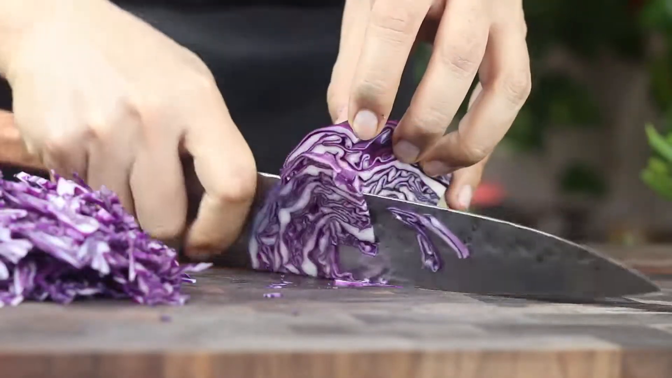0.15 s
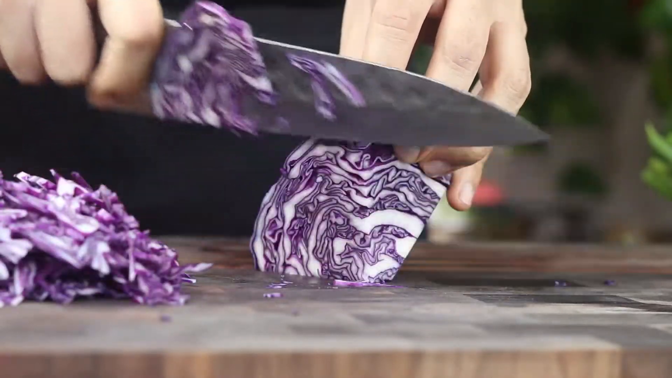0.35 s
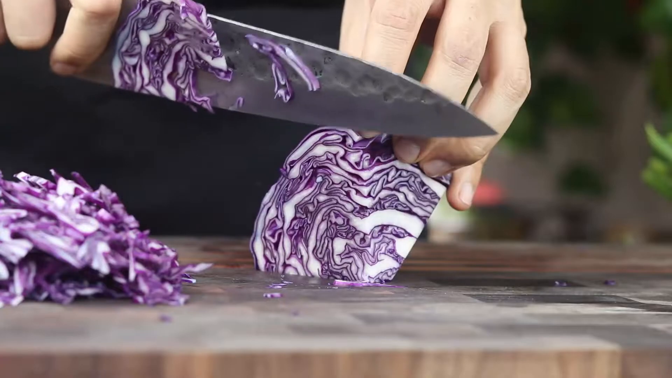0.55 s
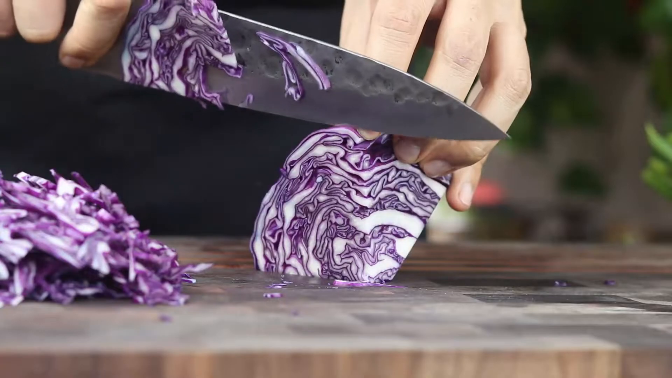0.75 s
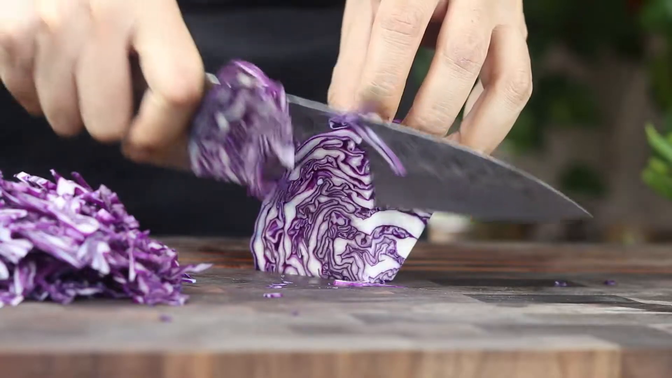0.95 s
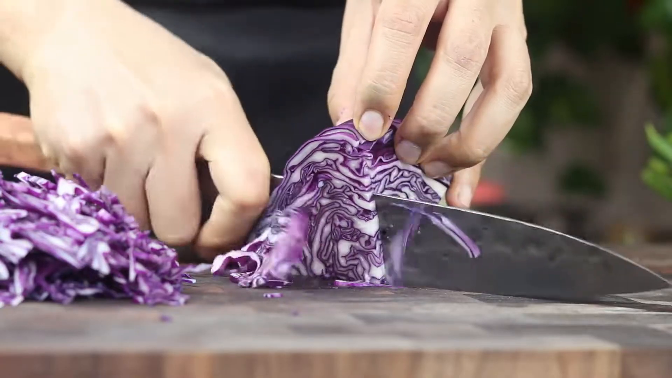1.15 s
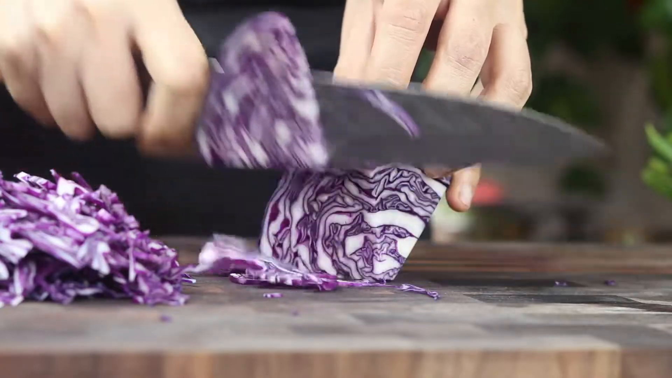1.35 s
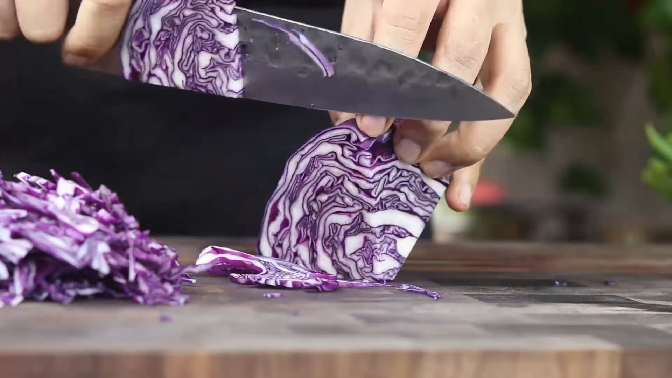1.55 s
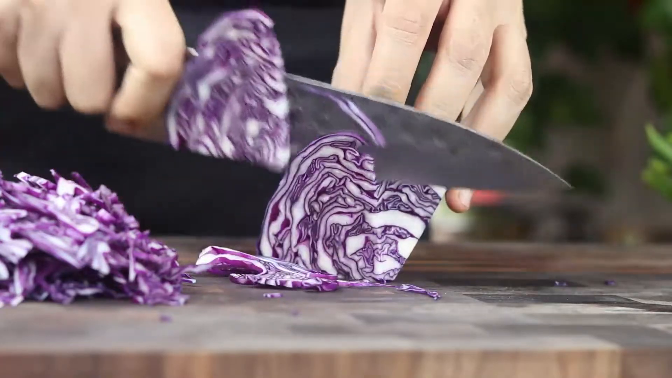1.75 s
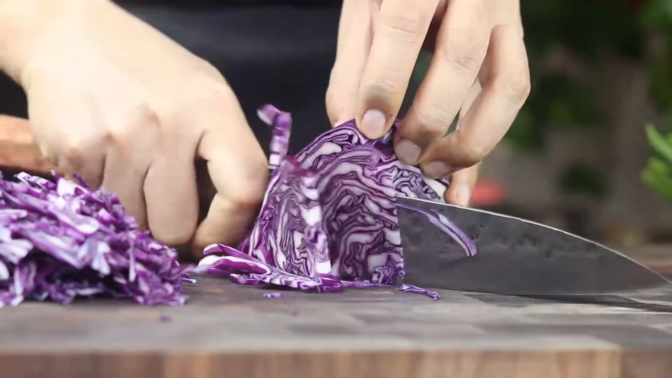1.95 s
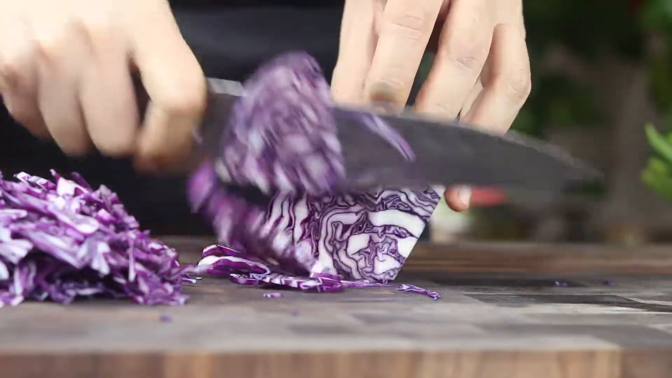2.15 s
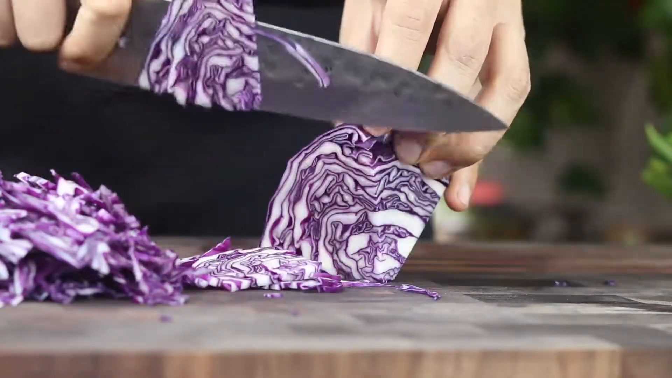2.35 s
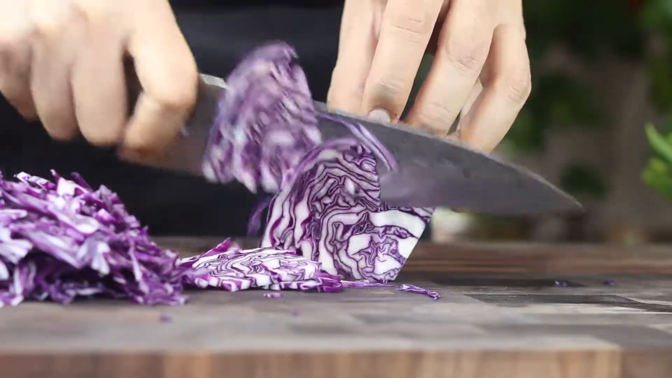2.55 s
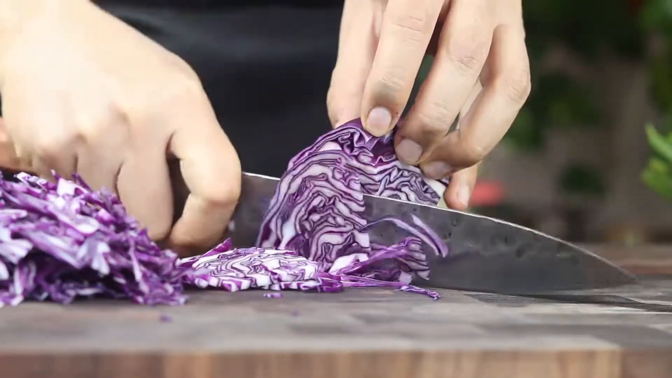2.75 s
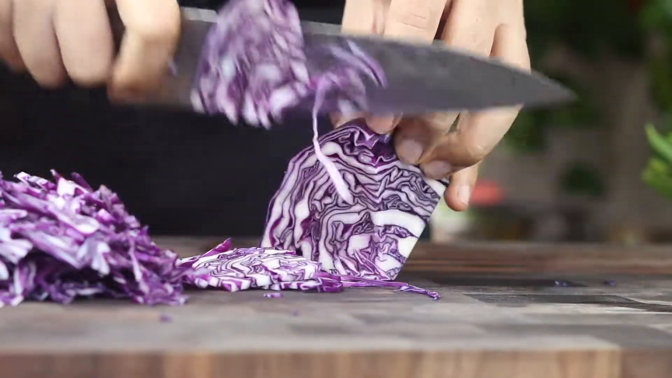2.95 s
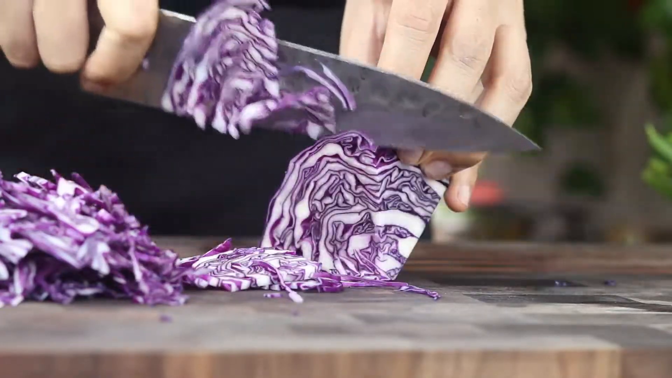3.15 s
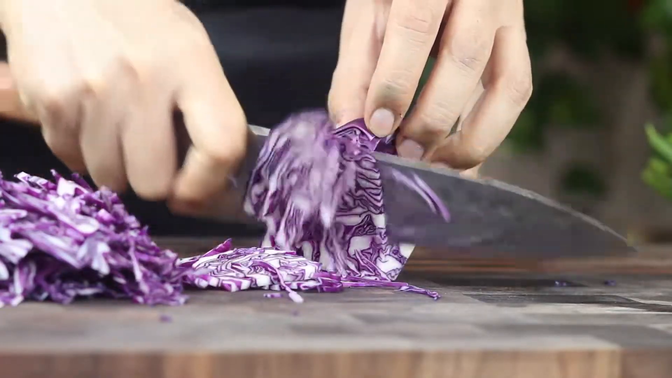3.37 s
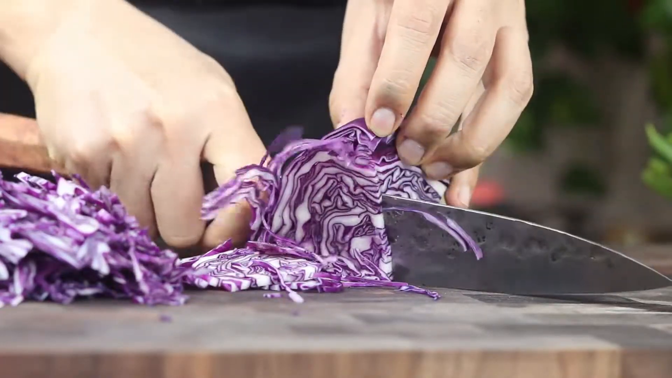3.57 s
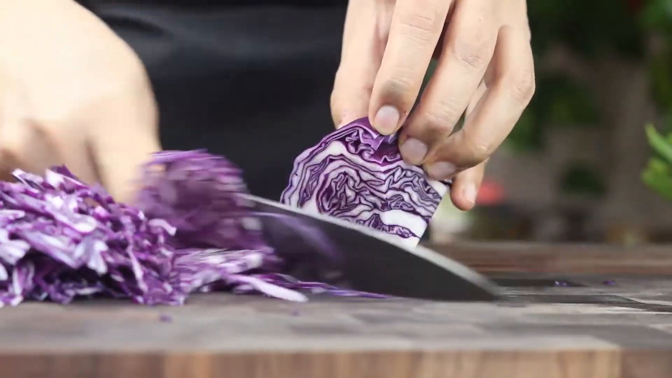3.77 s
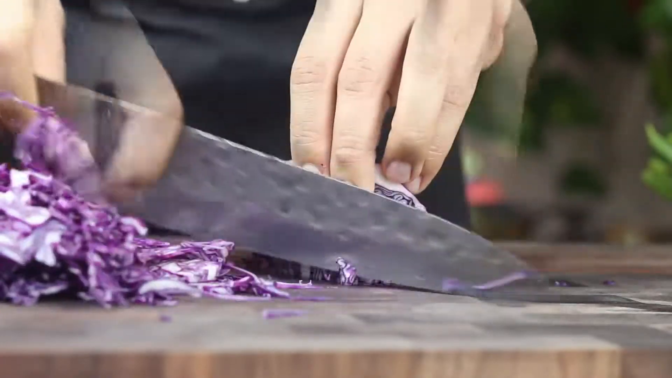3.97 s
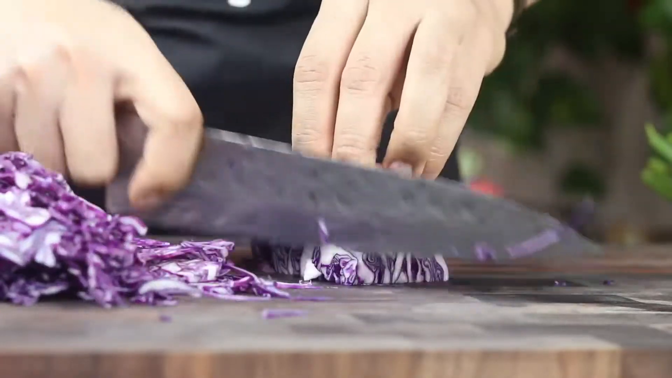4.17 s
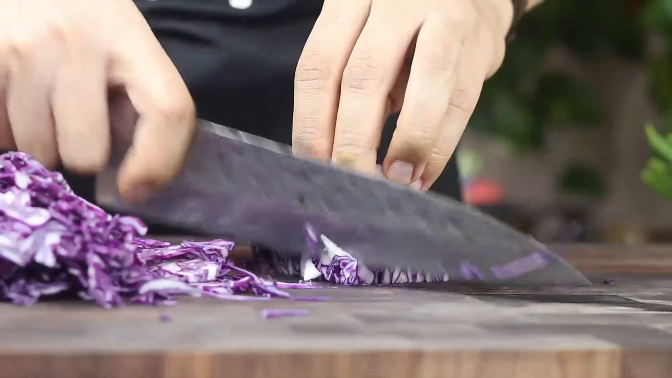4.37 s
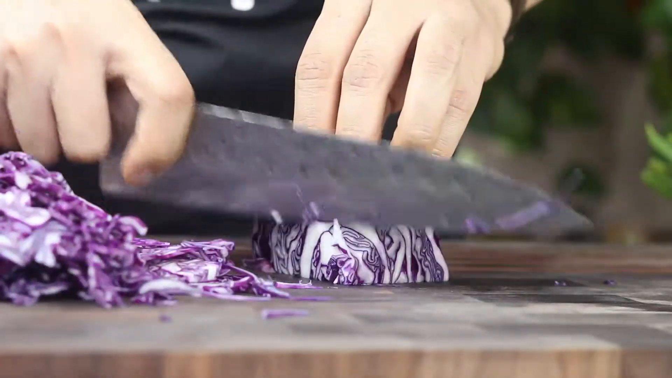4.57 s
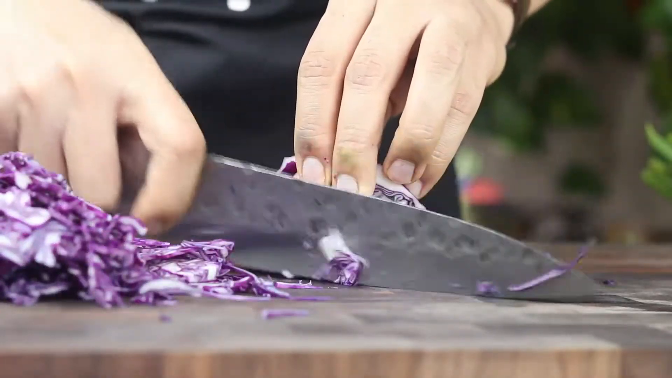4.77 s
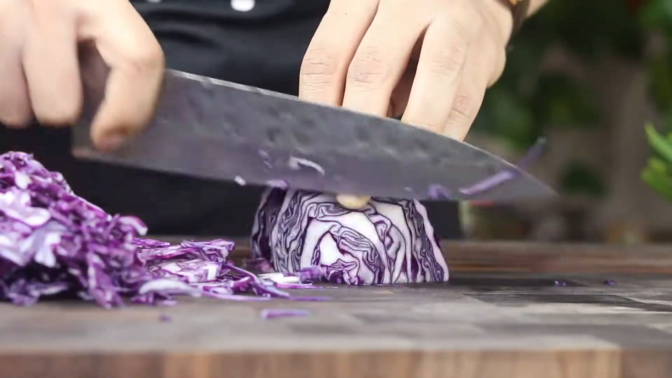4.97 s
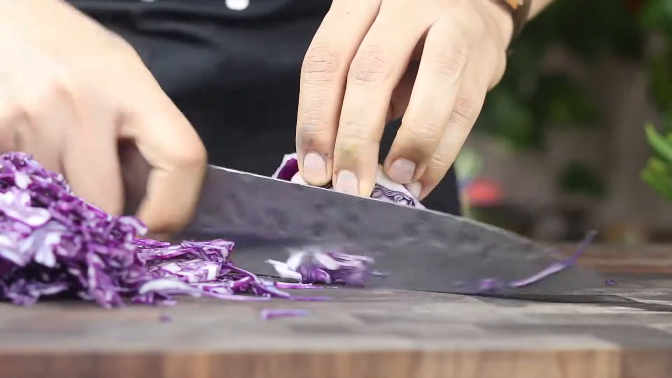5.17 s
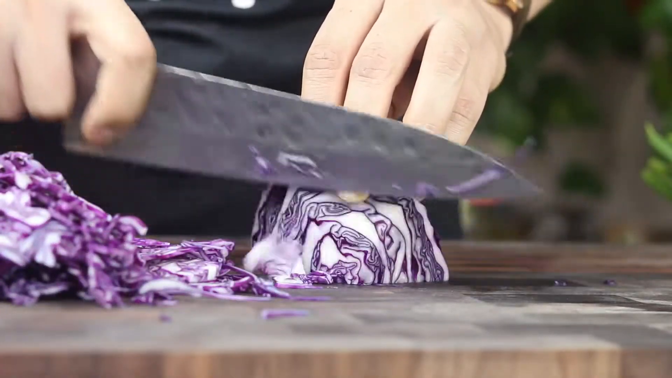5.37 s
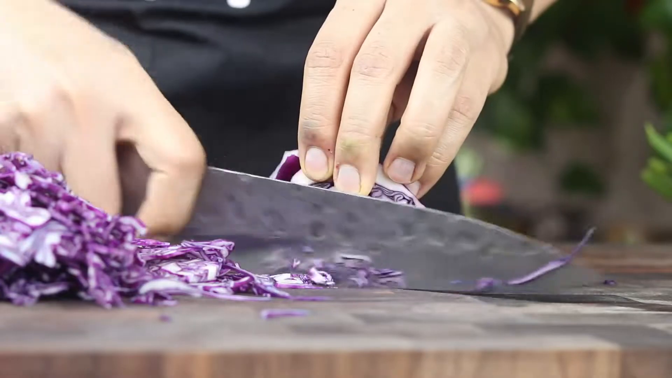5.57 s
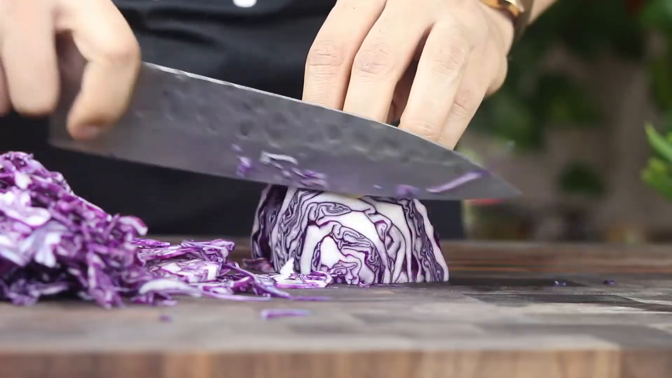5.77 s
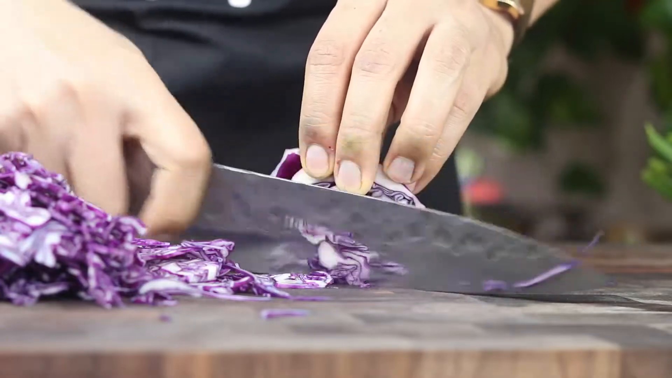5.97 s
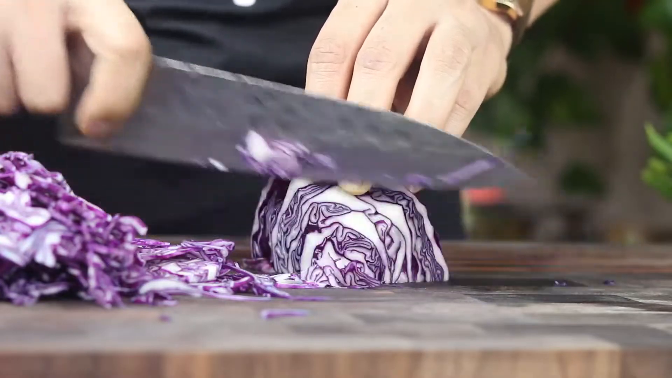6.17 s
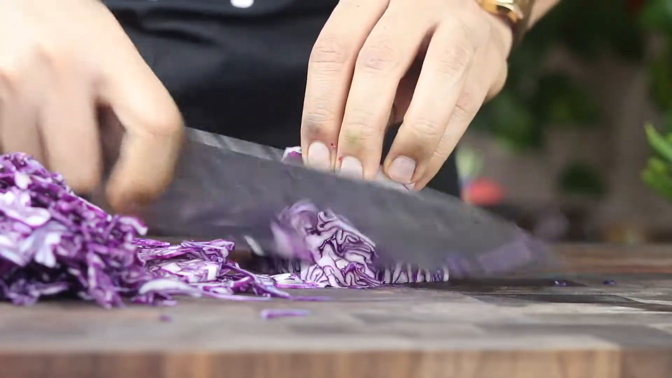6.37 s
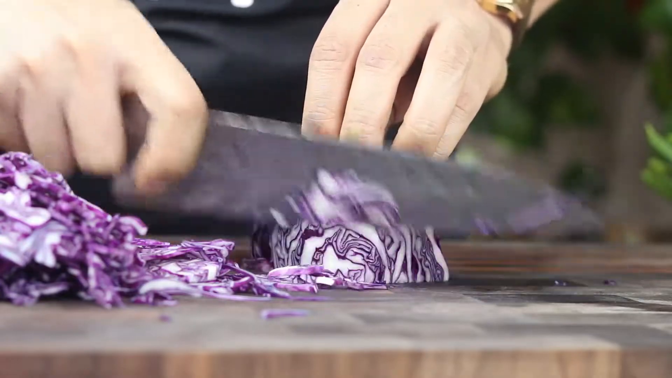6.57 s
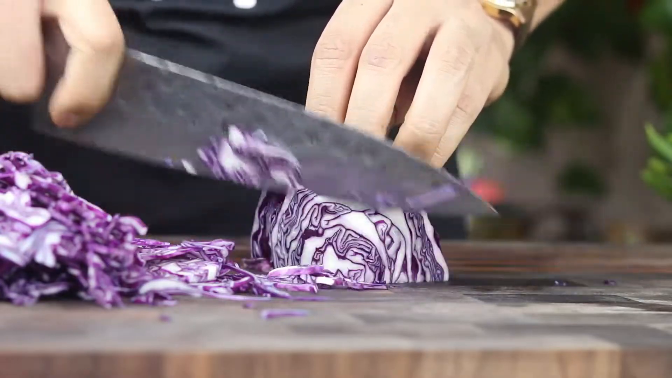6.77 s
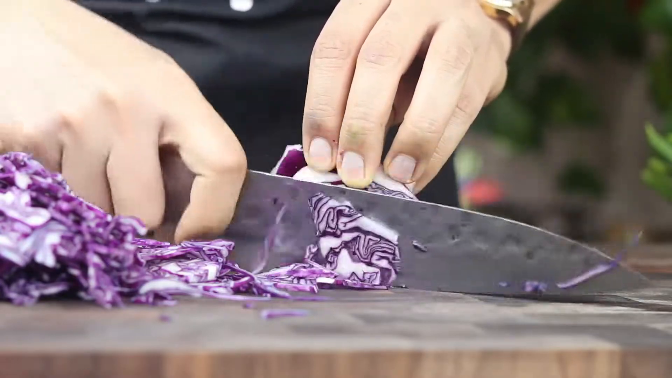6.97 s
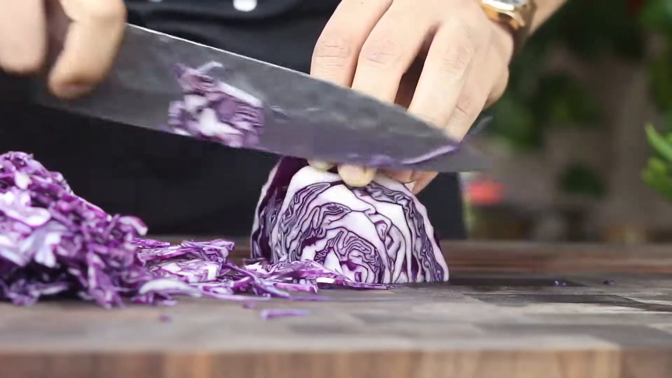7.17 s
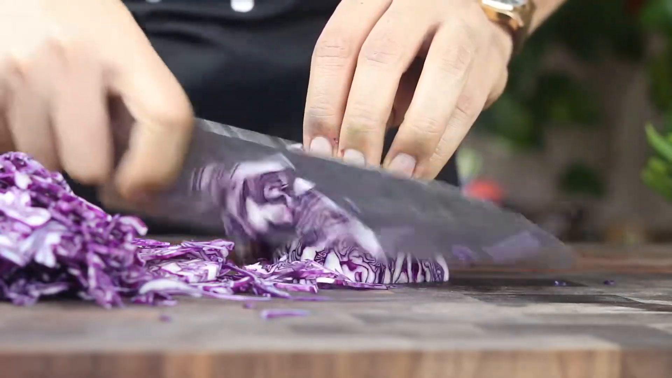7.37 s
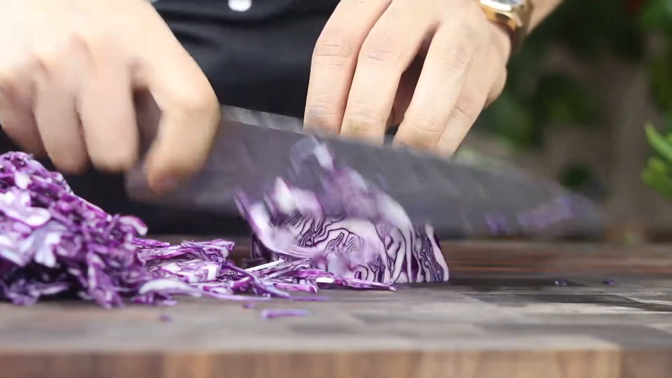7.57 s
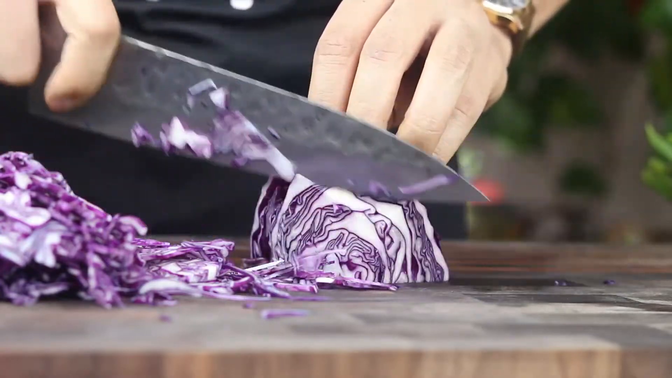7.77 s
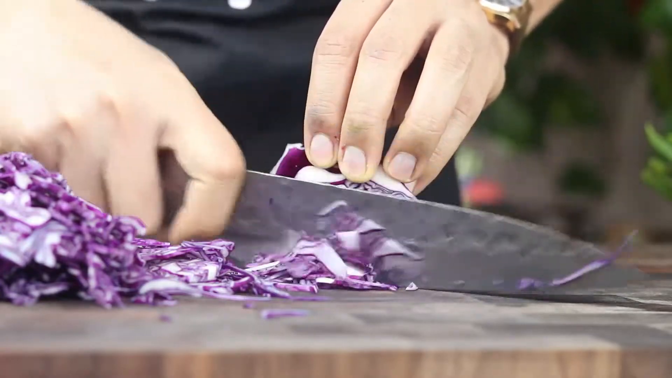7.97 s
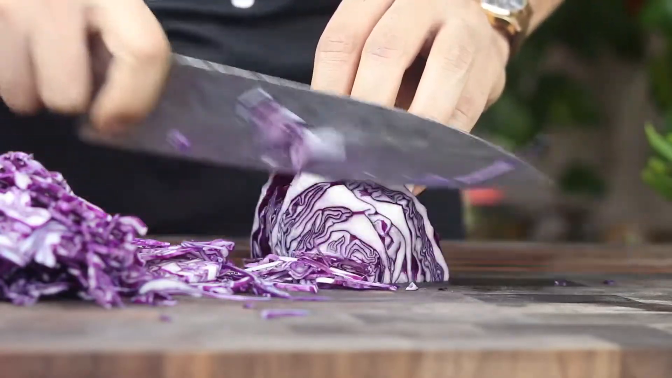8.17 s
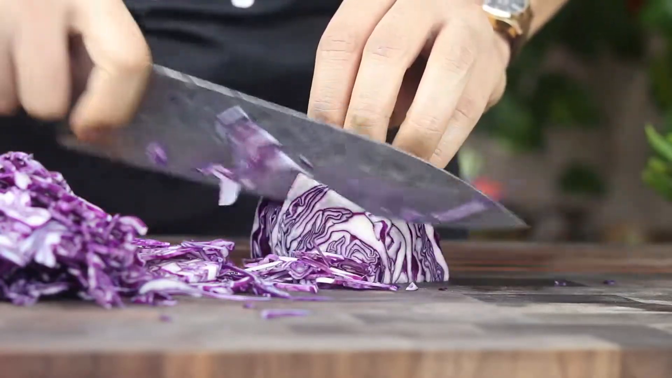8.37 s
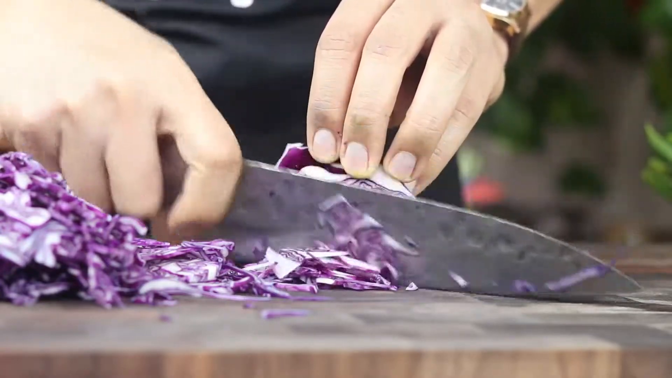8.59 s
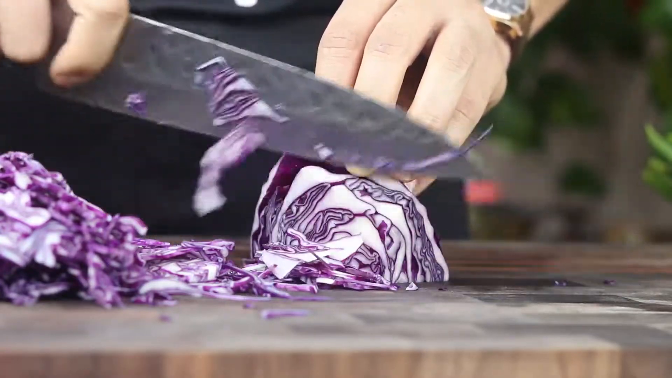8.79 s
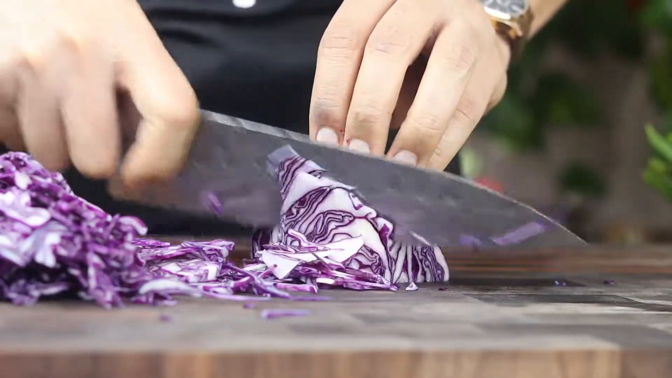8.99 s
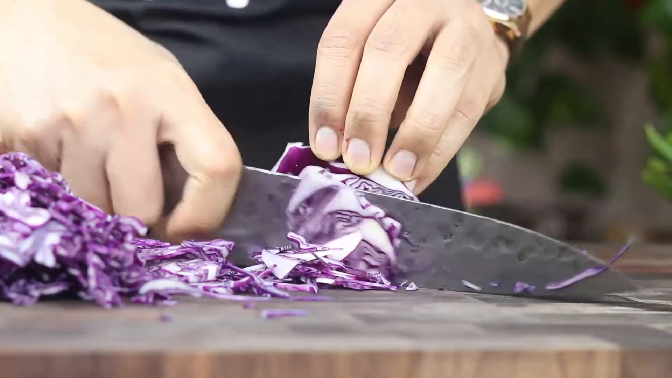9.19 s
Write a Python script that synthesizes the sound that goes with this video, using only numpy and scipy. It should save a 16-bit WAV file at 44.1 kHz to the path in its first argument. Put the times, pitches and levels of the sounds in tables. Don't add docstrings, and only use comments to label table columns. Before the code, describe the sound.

A heavy kitchen knife crunches through dense cabbage in repeated strokes, each ending in a hard woody knock on a thick board in an echoing kitchen.

```python
import sys
import numpy as np
from scipy import signal
from scipy.fft import rfft, irfft, next_fast_len
from scipy.io import wavfile
from scipy.ndimage import uniform_filter1d

SR = 44100
rng = np.random.default_rng(int(sys.argv[2]) if len(sys.argv) > 2 else 0)


def voltage_ratio(level):
    return 10 ** (np.asarray(level, float) / 20)


def store_wav(level_fs):
    pcm = np.round(np.clip(np.atleast_2d(level_fs), -1, 1) * 32767)
    wavfile.write(sys.argv[1], SR, pcm.T.astype(np.int16))


N = 407043

# (time [s], blow [dB], low modes [dB], upper modes [dB], blade ring [dB])
KNOCKS = [(0.1452, -21.5, 2, -8, -33), (1.2056, -27.5, 5, -8, -26), (2.0018, -2.5, -6, 9, -18),
          (2.7105, 3.5, -12, 5, -2.5), (3.5458, -19.5, -0.5, -10, -22), (4.0831, -28.5, -3, -8.5, -28),
          (4.5101, -12, -6.5, -0.5, -13), (4.8773, -9.5, -7, 1, -19), (5.242, -5.5, -7.5, 2, -15),
          (5.622, -4, -8.5, 3.5, -5), (6.0553, -12, -3.5, -5.5, -45), (6.4892, -8.5, -5, 1, -16),
          (7.007, -16.5, 1.5, -5, -36), (7.4931, 0, -10.5, 2.5, -10), (8.025, -6, -7.5, 1.5, -7.5),
          (8.566, -7.5, -7.5, 2, -12), (9.1597, -16, 1, -5, -30)]
# (frequency [Hz], level [dB], t60 [s])
LOW_MODES = [(133.6, -13, 0.054), (193, -11.5, 0.033), (243.2, -15.5, 0.22), (358.6, -2, 0.032),
             (437.6, -6, 0.091), (602.5, 10.5, 0.035), (662.4, 2, 0.025), (773, 1.5, 0.054),
             (992.3, -0.5, 0.062)]
# (frequency [Hz], level [dB], t60 [s])
MID_MODES = [(1113, -10, 0.021), (1283, -2.5, 0.034), (1411, 1.5, 0.015)]
# (frequency [Hz], level [dB], t60 [s])
UPPER_MODES = [(1492, -3, 0.0089), (1642, 1, 0.016), (1871.5, -5, 0.018), (1780, 7.5, 0.0097),
               (1854, 3, 0.018), (1988.5, -1.5, 0.026)]
# (frequency [Hz], level [dB], t60 [s])
BLADE_MODES = [(3717, 4, 0.0098), (2800, -6, 0.0033), (5400, -6, .002), (6850, -12, 0.003)]
# (frequency [Hz], density [dB per Hz])
CRACK_SPECTRUM = [(1800, -16), (2300, 3.5), (2800, 5), (3400, -6.5), (5200, -18.5), (7000, -22.5),
                  (10000, -32), (15000, -48.5)]
# (delay [s], level [dB])
BOUNCES = [
    (0, 3),
    (.0026, -18.5),
    (.0047, -3.5),
]
# (frequency [Hz], level [dB], t60 [s])
CUPBOARD_MODES = [(278.7, -22.5, 0.88), (382.8, -23, 1), (445.8, -13, 0.37), (600, -15.5, 0.78),
                  (1040, -21, 0.73), (1194, -21.5, 1)]
# (start [s], end [s], bite [s], tearing once in [dB], tearing at end [dB])
STROKES = [(-0.02, 0.143, 0.023, -45.5, -45.5), (0.817, 1.06, .11, -47, -48.5),
           (1.049, 1.197, .03, -42.5, -44), (1.692, 2.004, 0.037, -49.5, -44.5),
           (2.467, 2.686, 0.014, -49, -47), (3.179, 3.55, 0.037, -50, -42),
           (3.696, 3.93, 0.025, -64.5, -58), (4.447, 4.509, 0.02, -47.5, -51.5),
           (4.808, 4.875, 0.0081, -46.5, -51), (5.169, 5.231, 0.011, -48.5, -47),
           (5.556, 5.606, 0.0054, -48, -50.5), (5.921, 6.054, 0.017, -50.5, -46),
           (6.363, 6.503, 0.0085, -52, -45), (6.843, 6.999, .013, -51, -46),
           (7.305, 7.478, 0.022, -57.5, -47), (7.834, 8.022, 0.033, -53.5, -45),
           (8.369, 8.58, 0.056, -52, -43), (8.893, 9.156, .06, -53.5, -43.5)]
# (frequency [Hz], density [dB per Hz])
LEAF_SPECTRUM = [(380, -34), (590, -3), (750, -15), (1470, -8.5), (2400, -6.5), (3200, -6), (8000, -11),
                 (15500, -21.5)]
# (time [s], level [dB])
LEAF_SNAPS = [
    (0.9248, -41),
    (1.468, -37),
    (2.2944, -25.5),
    (2.475, -25.5),
    (2.9024, -29),
    (3.2045, -28),
    (7.4745, -26),
    (8.912, -32),
    (1.095, -35.5),
    (3.228, -26),
]
# (time [s], level [dB], chatter [Hz])
SCRAPE_PATH = [
    (3.865, -56, 430),
    (3.885, -45, 570),
    (3.905, -41, 740),
    (3.918, -42, 850),
    (3.94, -60, 930),
]
# (frequency [Hz], t60 [s])
ROOM_T60 = [(200, 0.94), (500, 0.69), (1200, 0.72), (2000, 0.61), (4000, 0.62), (8000, 0.67)]
# (frequency [Hz], level [dB])
ROOM_COLOUR = [(200, 3.5), (600, 3.5), (1500, 0), (3000, -3.5), (6000, -2.5), (12000, -7.5)]
# (time [s], level [dB], frequency [Hz], t60 [s])
NUDGE = (8, -47, 77, .25)
# (time [s], level [dB])
RUMBLE_SWELL = [(0.0, -73), (0.5, -52.5), (1.1, -56), (1.8, -62), (3.3, -54.5), (3.5, -75), (4.2, -63),
                (4.4, -53), (5.0, -66.5), (6.2, -67), (7.0, -62), (7.6, -67), (8.4, -63.5), (9.23, -61)]
# (frequency [Hz], density [dB per Hz])
RUMBLE_SPECTRUM = [(22, -27), (33, -8.5), (40, 5), (46, -8), (60, -18.5), (80, -36), (150, -70.5)]
# (frequency [Hz], density [dB per Hz])
AIR_SPECTRUM = [(25, -28.5), (70, -5), (120, -5), (250, -9.5), (400, -9.5), (700, -16), (1200, -16.5),
                (2500, -50)]
# (frequency [Hz], correlation [0-1])
EAR_LIKENESS = [(60, 0.9), (240, 0.74), (950, 0.29), (3770, 0.05), (15000, 0.04)]
# (frequency [Hz], left minus right [dB])
BALANCE = [(40, -2), (200, -0.2), (1000, -0.15), (3000, -1.5), (12000, 1.5)]
# (frequency [Hz], density [dB per Hz])
HISS_SPECTRUM = [(710, -40), (1200, -23), (1900, -20), (2410, -22.5), (3690, -24), (15500, -38)]


def evened(x):
    return x / np.sqrt(np.mean(x ** 2) + 1e-20)


def read(points, hz):
    f, value = np.transpose(points)
    return np.interp(np.log(hz + 1), np.log(f + 1), value)


def add(mix, start_s, sound):
    part = mix[..., round(start_s * SR):][..., :sound.shape[-1]]
    part += sound[..., :part.shape[-1]]


def coloured(x, db_at):
    size = next_fast_len(x.shape[-1], True)
    gain = voltage_ratio(db_at(np.fft.rfftfreq(size, 1 / SR)))
    return irfft(rfft(x, size) * gain, size)[..., :x.shape[-1]]


def resonate(x, hz, width_hz):
    turn = np.exp(2j * np.pi * np.cumsum(hz) / SR)
    r = np.exp(-np.pi * width_hz / SR)
    return 2 * (turn * signal.lfilter([1 - r], [1, -r], x / turn)).real


def ring(modes, spot, seconds):
    t = np.arange(round(seconds * SR)) / SR
    contact = (1 - np.exp(-t / 0.00075)) ** 2
    total = np.zeros((2, len(t)))
    for k, ((hz, db, t60_s), (strength, spread)) in enumerate(zip(modes, spot)):
        phase = np.outer([1, -1], 0.5 * spread * np.tanh(hz / 900))
        envelope = voltage_ratio(db + 1.02 * strength - 60 * t / t60_s)
        total += (-1) ** k * envelope * np.sin(2 * np.pi * hz * t + phase)
    return contact * total


def knocks():
    near, far, rung = np.zeros((3, 2, N))
    spots = rng.standard_normal((len(KNOCKS), 4, 9, 2))
    grits = rng.standard_normal((len(KNOCKS), 3, 1024))
    t = np.arange(1024) / SR
    crack_envelope = voltage_ratio(-60 * t / 0.014) * (1 - np.exp(-t / 0.00069))
    for (s, blow_db, low_db, upper_db, blade_db), spot, grit in zip(KNOCKS, spots, grits):
        board = voltage_ratio(low_db - 7.5) * ring(LOW_MODES, spot[0], 0.034)
        board += ring(MID_MODES, spot[1], 0.034)
        board += voltage_ratio(upper_db - 4.5) * ring(UPPER_MODES, spot[2], 0.034)
        board += voltage_ratio(blade_db) * ring(BLADE_MODES, spot[3], 0.034)
        burst = (grit[0] + grit[1:]) * crack_envelope
        crack = evened(coloured(np.roll(burst, 40, axis=1), lambda f: read(CRACK_SPECTRUM, f)))
        add(board, 0, crack * voltage_ratio(-28.5 + 0.91 * upper_db))
        for delay_s, db in BOUNCES:
            add(near, s + delay_s, voltage_ratio(blow_db + db) * board)
        add(far, s, voltage_ratio(blow_db) * board)
        add(rung, s, voltage_ratio(blow_db + low_db) * ring(CUPBOARD_MODES, spot[0], 0.16))
    return near, far, rung


def strokes():
    bite_db, shove_db, shove_s = -19.5, 4.5, 0.03
    linger_s, linger_s_per_db = 0.041, 0.0012
    squeak_hz, squeak_hz_per_speed, squeak_sag = 3160, 113, 0.17
    t = np.arange(N) / SR
    knock_s, blow_db = np.transpose(KNOCKS)[:2]
    level_db, depth, hz = np.full(N, -120.), np.zeros(N), np.full(N, float(squeak_hz))
    for start, end, bite, in_db, end_db in STROKES:
        soft_db = max(-blow_db[np.argmin(abs(knock_s - end))], 0)
        t60_s = linger_s + linger_s_per_db * soft_db
        push_db = shove_db * max(1 - soft_db / 18, 0)
        db = np.interp(t, [start, start + bite, end], [in_db + bite_db, in_db, end_db])
        db += push_db * np.exp(-abs(end - t) / shove_s)
        db -= 60 * np.maximum(t - end - 0.004, 0) / t60_s
        here = (t >= start) & (db > level_db)
        deep = np.clip((t - start) / (end - start), 0, 1)
        pitch_hz = (squeak_hz + squeak_hz_per_speed / (end - start)) * (1 - squeak_sag * deep)
        level_db[here], depth[here], hz[here] = db[here], deep[here], pitch_hz[here]
    return level_db, depth, hz


def slices():
    tear_db, depth, hz = strokes()
    t = np.arange(N) / SR
    span = round(0.021 * SR)
    layer, gloss, bulk, bend = (evened(uniform_filter1d(uniform_filter1d(v, span), span))
                                for v in rng.standard_normal((4, N)))
    shared, *own = rng.standard_normal((3, N))
    cell_snaps = voltage_ratio(0.95 * rng.exponential(1, N)) * (rng.random(N) < 2500 / SR)
    clumps = voltage_ratio(1.2 * evened(uniform_filter1d(rng.standard_normal(N), 300)))
    cells = (shared * (1 + 0.5 * evened(cell_snaps)) + 1.01 * np.array(own)) * clumps
    cells = coloured(cells, lambda f: read(LEAF_SPECTRUM, f))

    def band(lo_hz, hi_hz):
        return coloured(cells, lambda f: -60. * ((f < lo_hz) | (f >= hi_hz)))

    body, crunch, tear, fizz = band(0, 2000), band(2000, 3800), band(3800, 8000), band(8000, SR)
    deep = voltage_ratio(0.65 * np.minimum(np.interp(t - 0.012, t, tear_db) - tear_db, 0))
    squeak = 0.6 * resonate(deep * crunch + tear, hz * (1 + 0.074 * bend), 700)
    sound = deep * voltage_ratio(0.6 + 1.2 * bulk) * body
    sound += deep * voltage_ratio(0.5 * (depth - 1.5) + 2.5 * bulk[::-1]) * crunch
    sound += voltage_ratio(1.9 * bend[::-1]) * tear + voltage_ratio(4.8 * gloss[::-1]) * squeak
    sound /= np.std(tear)
    sound += voltage_ratio(-4.5 + 2.5 * depth + 1.5 * gloss) * evened(fizz)
    return voltage_ratio(tear_db + 0.44 * layer + 3) * sound


def snaps():
    out, t = np.zeros((2, N)), np.arange(512) / SR
    for (s, db), noise in zip(LEAF_SNAPS, rng.standard_normal((len(LEAF_SNAPS), 2, 512))):
        bright = coloured(noise + 0.5 * noise[::-1], lambda f: read(LEAF_SPECTRUM, f))
        add(out, s, voltage_ratio(db - 60 * t / 0.0086) * bright)
    return out


def scrape():
    s, db, hz = np.transpose(SCRAPE_PATH)
    t = np.arange(s[0], s[-1], 1 / SR)
    glide_hz = np.interp(t, s, hz)
    rub = resonate(rng.standard_normal(len(t)), glide_hz, 170)
    rub = evened(resonate(rub, glide_hz, 400))
    out = np.zeros(N)
    add(out, s[0], voltage_ratio(np.interp(t, s, db)) * rub * signal.windows.tukey(len(t), 0.2))
    return out


def nudge():
    s, db, hz, t60_s = NUDGE
    t, out = np.arange(SR // 3) / SR, np.zeros(N)
    onset = (1 - np.exp(-t / 0.022)) ** 2
    add(out, s, voltage_ratio(db - 60 * t / t60_s) * onset * np.sin(2 * np.pi * hz * t))
    return out


def room(x):
    taps = np.zeros((3, SR))
    at = np.arange(200, SR - 20, 20) + rng.integers(0, 20, (3, (SR - 201) // 20))
    np.put_along_axis(taps, at, rng.choice([-1., 1.], at.shape), 1)
    hz, t, z = signal.stft(taps[0] + 2.2 * taps[1:], SR, nperseg=256)
    shape_db = read(ROOM_COLOUR, hz)[:, None] - 60 * t / read(ROOM_T60, hz)[:, None]
    tail = signal.istft(z * voltage_ratio(shape_db), SR, nperseg=256)[1]
    wet = signal.fftconvolve(x[None], tail / np.linalg.norm(tail[0]), axes=1)[:, :N]
    side = coloured(wet[0] - wet[1], lambda f: -10 * np.log10(1 + (800 / (f + 1)) ** 3.7))
    return wet.mean(0) + np.outer([0.5, -0.5], side)


def hush():
    def likeness(f):
        return np.clip(read(EAR_LIKENESS, f), 0.01, 0.99)

    left, other = rng.standard_normal((2, N))
    right = coloured(left, lambda f: 20 * np.log10(likeness(f)))
    right += coloured(other, lambda f: 10 * np.log10(1 - likeness(f) ** 2))
    both = np.array([left, right])
    swell = voltage_ratio(np.interp(np.arange(N) / SR, *np.transpose(RUMBLE_SWELL)))
    drift = evened(uniform_filter1d(rng.standard_normal(N), SR // 4))
    hum = np.sin(2 * np.pi * np.cumsum(40.3 + 1.2 * drift) / SR)
    floor = evened(coloured(both, lambda f: read(RUMBLE_SPECTRUM, f)))
    air = evened(coloured(both, lambda f: read(AIR_SPECTRUM, f)))
    return swell * (1.9 * hum + 0.38 * floor) + voltage_ratio(-52.5) * air


def scene():
    near, far, rung = knocks()
    leaves, drag = slices() + snaps(), scrape()
    echo = room(voltage_ratio(2.5) * far[0] + voltage_ratio(-6.5) * leaves.mean(0) + voltage_ratio(-5) * drag)
    small = signal.butter(2, 120, "high", fs=SR, output="sos")
    return signal.sosfilt(small, near + rung + leaves + drag + echo) + hush() + nudge()


def roll_off(x):
    return signal.sosfilt(signal.butter(12, 15640, fs=SR, output="sos"), x)


def record(dry):
    ears = np.array([coloured(x, lambda f: side * read(BALANCE, f) / 2) for x, side in zip(dry, (1, -1))])
    t = np.arange(N) / SR
    lag, grip = np.exp(-1 / (0.005 * SR)), np.exp(-1 / (0.0021 * SR))
    power = signal.lfilter([1 - lag], [1, -lag], (ears ** 2).mean(0))
    power_db = 10 * np.log10(power + 1e-12)
    fall_db = 140 * t
    held_db = np.maximum.accumulate(power_db + fall_db) - fall_db
    over_db = np.maximum(held_db + 18.5, 0)
    late_db = np.interp(t - 0.005, t, signal.lfilter([1 - grip], [1, -grip], over_db))
    ducked = ears / voltage_ratio(0.78 * late_db)
    hiss = voltage_ratio(-56) * evened(coloured(rng.standard_normal(dry.shape), lambda f: read(HISS_SPECTRUM, f)))
    rounded = ducked / (1 + (ducked / 0.99) ** 4) ** 0.25
    overload = coloured(rounded - ducked,
                        lambda f: -10 * np.log10((1 + (200 / (f + 1)) ** 4) * (1 + (f / 6500) ** 4)))
    edged = coloured(ducked + overload + hiss, lambda f: -60. * (f > 15750))
    mix = np.clip(edged, -1, 1)
    return roll_off(mix)


dry = scene()
out = record(dry)
store_wav(out)
```